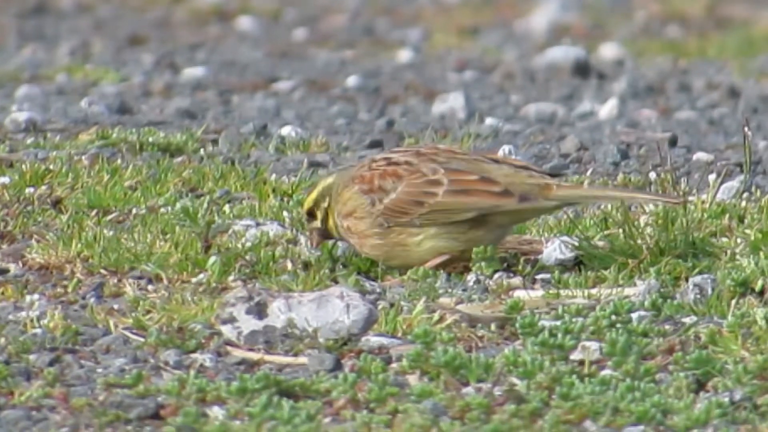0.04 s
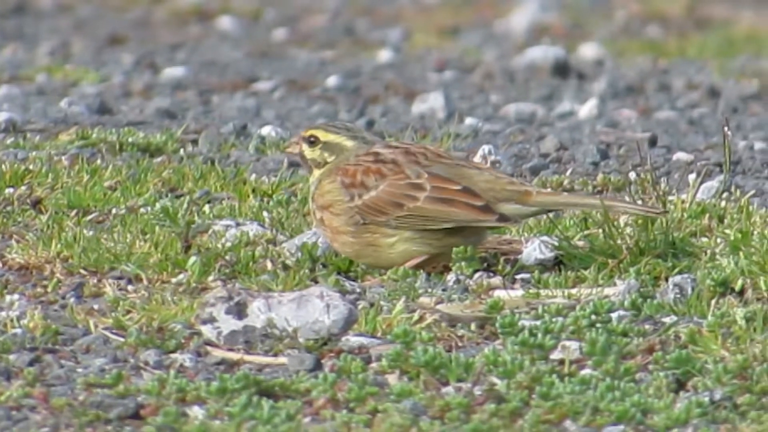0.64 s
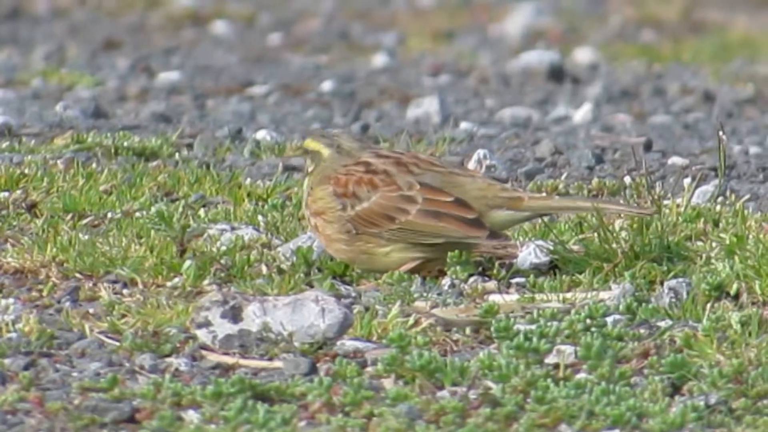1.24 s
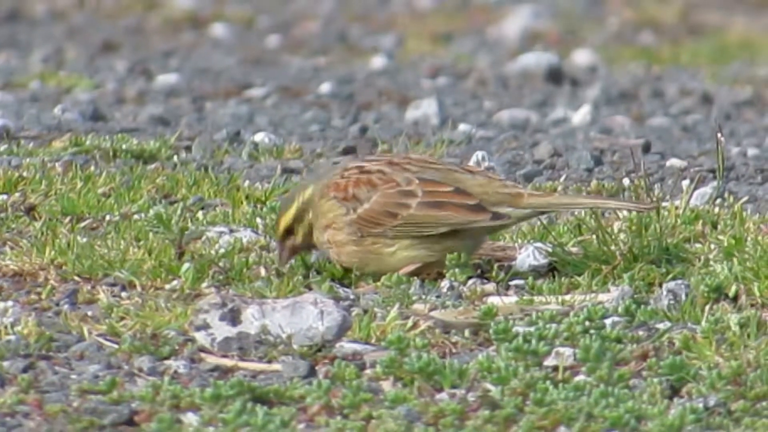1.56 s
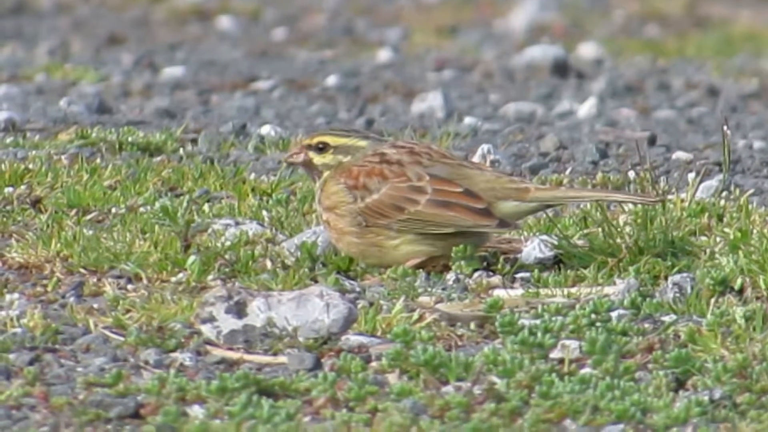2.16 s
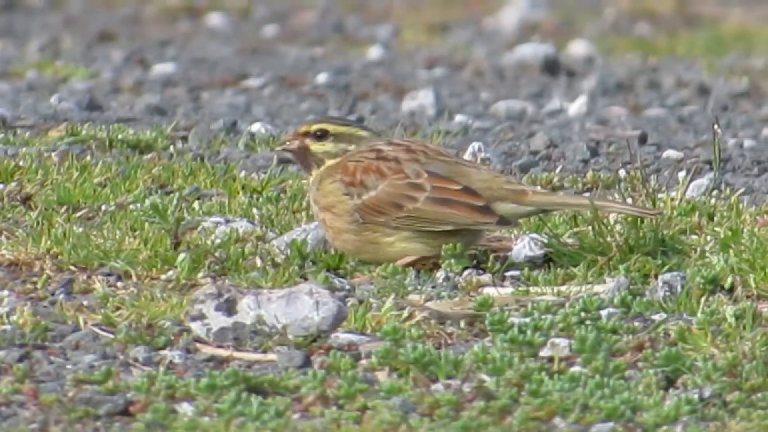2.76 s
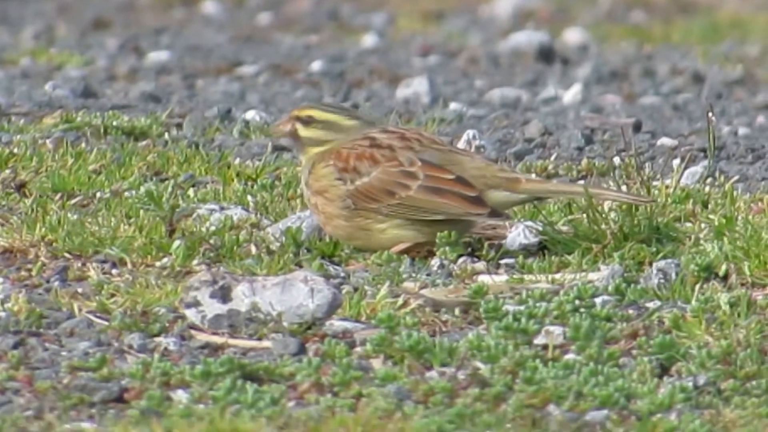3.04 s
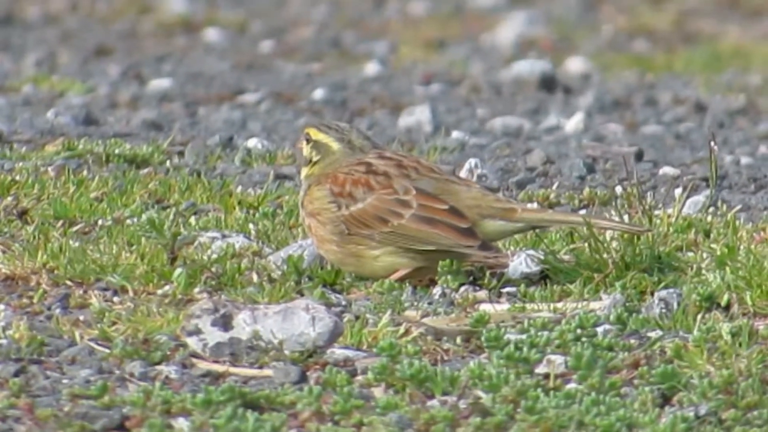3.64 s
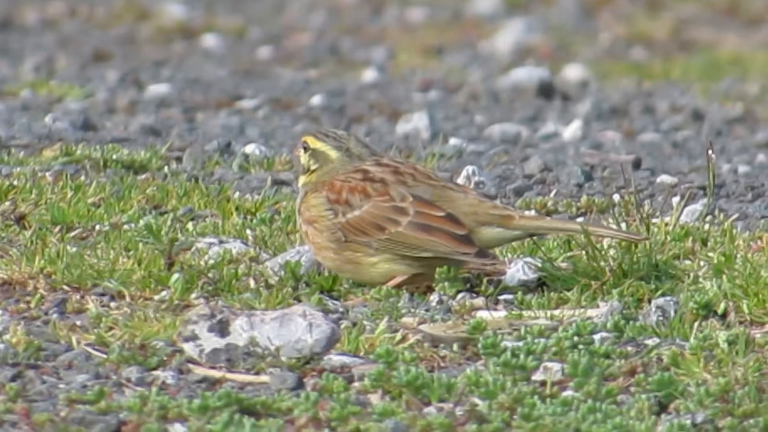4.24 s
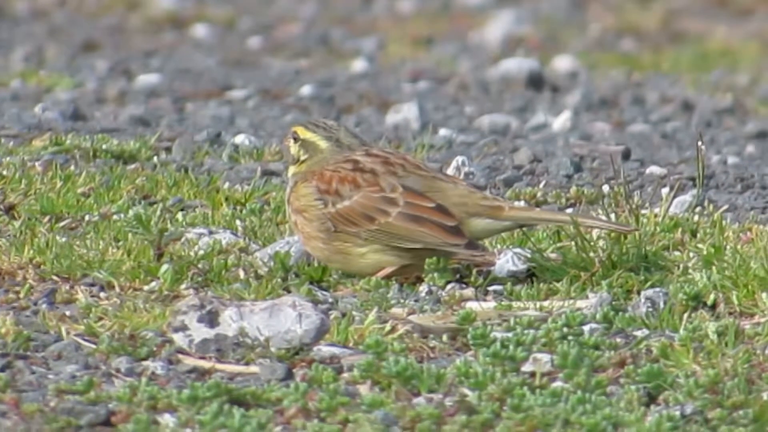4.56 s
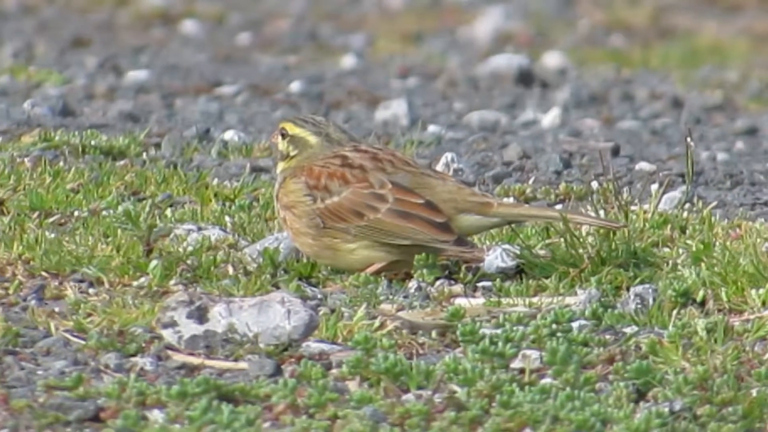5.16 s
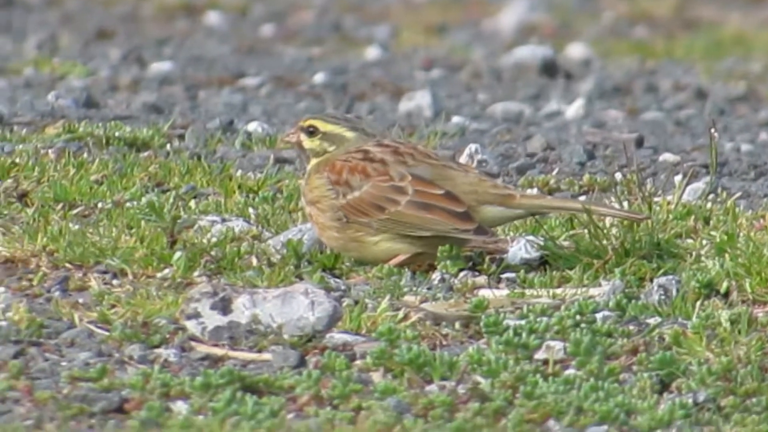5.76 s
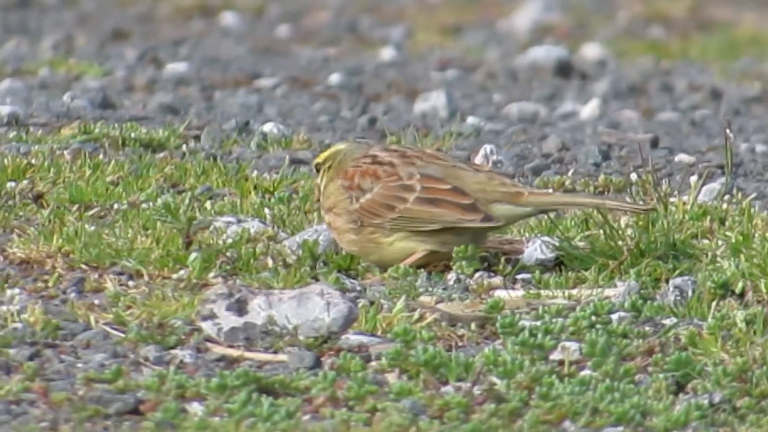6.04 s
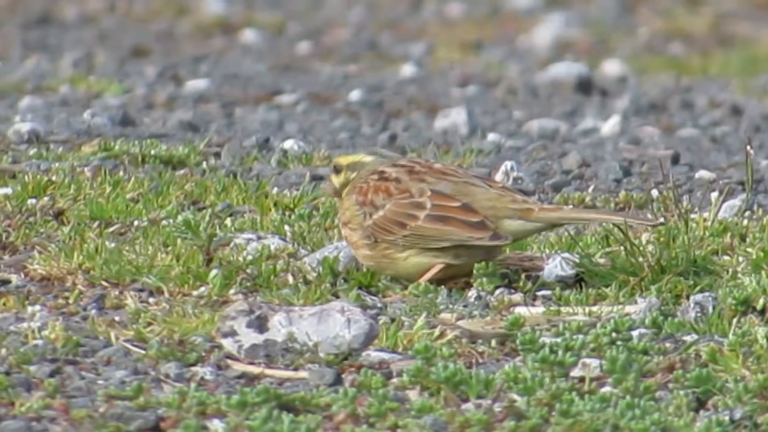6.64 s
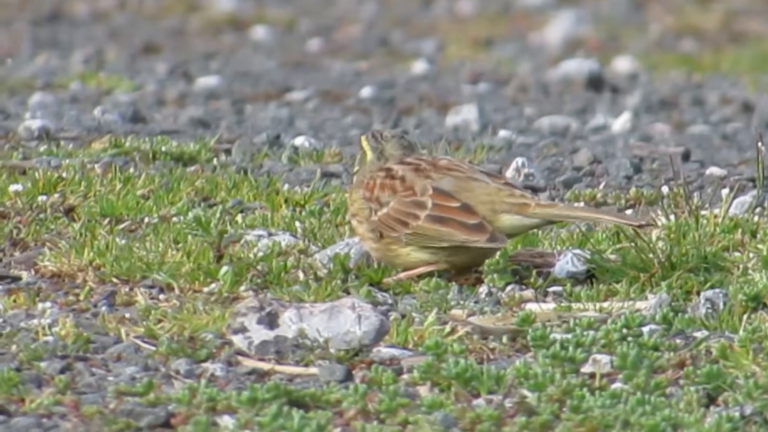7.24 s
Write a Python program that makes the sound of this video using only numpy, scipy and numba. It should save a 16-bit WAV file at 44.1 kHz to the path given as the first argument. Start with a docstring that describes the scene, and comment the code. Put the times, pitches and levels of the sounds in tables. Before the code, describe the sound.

Wind gusts rumble on the microphone over a distant engine hum, while a small bird gives two thin falling whistles and others chirp far off.

```python
"""Wind gusts buffet a camera microphone on open grassland; their eddies rumble and push the limiter down.
A distant engine throbs under airy hiss while the lens drive whirrs and whines.
A near bird whistles two thin falling calls; others chirp, pip and sing a falling run far off.
Two tiny ticks and a soft knock sound close by."""
import sys
import numpy as np
from scipy import signal
from scipy.fft import rfft, irfft
from scipy.io import wavfile
from scipy.ndimage import uniform_filter1d
from numba import njit

SR = 44100
rng = np.random.default_rng(int(sys.argv[2]) if len(sys.argv) > 2 else 0)


def materialize(psi):
    """Save the field psi as 16-bit PCM at rate SR to the path in sys.argv[1].

    A 1-D psi becomes a single channel; in a 2-D psi each row is a channel.
    """
    bounded = np.clip(np.atleast_2d(psi).T, -1, 1)
    quanta = np.round(bounded * 32767).astype(np.int16)
    wavfile.write(sys.argv[1], SR, quanta)


N = 326781
TIME = np.arange(N) / SR


def undb(db):
    """Decibels to gain."""
    return 10 ** (np.asarray(db) / 20)


def unit(x):
    """Scale to rms 1."""
    return x / np.sqrt(np.mean(x ** 2))


def walk(rate_hz):
    """Random drift, rms 1: held levels, smoothed twice."""
    hold = max(int(SR / rate_hz), 1)
    steps = np.repeat(rng.standard_normal(N // hold + 1), hold)
    return unit(uniform_filter1d(uniform_filter1d(steps, hold), hold)[:N])


def swells(rows):
    """Gain curve of bell-shaped swells."""
    return sum(undb(db) * np.exp(-((TIME - peak_s) / half_s) ** 2 / 2) for peak_s, half_s, db in rows)


@njit
def lowpass(x, corner_hz, damping):
    """State-variable low-pass with a moving corner."""
    y, band_state, low_state = np.empty(len(x)), 0., 0.
    for i in range(len(x)):
        g = np.tan(np.pi * corner_hz[i] / SR)
        band = (band_state + g * (x[i] - low_state)) / (1 + g * (g + damping))
        y[i] = low_state + g * band
        band_state, low_state = 2 * band - band_state, 2 * y[i] - low_state
    return y


def resonate(x, hz, width_hz):
    """One resonance, gain 1 at its centre."""
    return signal.lfilter(*signal.iirpeak(hz, hz / width_hz, fs=SR), x)


def noise_band(hz, width_hz):
    """Complex narrowband noise: a resonance with wandering amplitude and phase."""
    sos = signal.butter(2, width_hz / 2, fs=SR, output="sos")
    real, imag = signal.sosfilt(sos, rng.standard_normal((2, N)))
    phase = 2 * np.pi * np.cumsum(np.broadcast_to(hz, N)) / SR
    return (unit(real) + 1j * unit(imag)) * np.exp(1j * phase)


def scatter(x, early_db, late_db, early_decay_s=0.0074, t60_s=0.42):
    """Direct sound, quick ground bounces and a tail from the bushes, different at each side."""
    t = TIME[:SR // 2]
    early, late = np.exp(-t / early_decay_s), undb(-60 * t / t60_s)
    early *= undb(early_db) / np.linalg.norm(early)
    late *= undb(late_db) / np.linalg.norm(late)
    tails = rng.standard_normal((2, len(t))) * np.hypot(early, late)
    return x + signal.fftconvolve(x[None], tails, axes=1)[:, :N]


# Each row: frequency in Hz, mid density in dB per Hz, side density in dB per Hz.
AIR_SPECTRUM = [(20, -88, -71.5), (43.7, -57.5, -79), (74, -54, -67), (144, -63.5, -71.5),
                (255, -72, -71.5), (405, -80.5, -74.5), (860, -76.5, -80.5), (1176, -83.5, -82),
                (1715, -85, -87.5), (2030, -90, -88), (3350, -93.5, -92.5), (7730, -98.5, -98.5),
                (10650, -102, -102), (14100, -110, -110)]


def air(swell_db=-1.07):
    """Far traffic and breeze: a gently drifting noise bed, diffuse above the bass."""
    log_hz = np.log(np.maximum(np.fft.rfftfreq(N, 1 / SR), 1))
    points_hz, *densities_db = np.transpose(AIR_SPECTRUM)
    gains = [undb(np.interp(log_hz, np.log(points_hz), db)) * np.sqrt(SR / 2) for db in densities_db]
    mid, side = (irfft(rfft(rng.standard_normal(N)) * gain, N) for gain in gains)
    return np.array([mid + side, mid - side]) * undb(swell_db * walk(1.9))


# Each row: peak time in seconds, half length in seconds, level in dB.
ENGINE_THROBS = [(.2, 0.36, -32.5), (1.82, 0.5, -33), (3.65, 0.51, -37), (6.15, 0.45, -35), (7.25, .2, -44)]


def engine(firing_hz=113.4, waver=0.0037, second_harmonic_db=-29):
    """A far engine's firing tone swells and fades, slightly to the right."""
    phase = 2 * np.pi * np.cumsum(firing_hz * (1 + waver * walk(5.98))) / SR
    tone = np.sqrt(2) * (np.sin(phase) + undb(second_harmonic_db) * np.sin(2 * phase))
    return tone * swells(ENGINE_THROBS) * undb([[-1], [1]])


# Camera body resonances. Each row: frequency in Hz, width in Hz, level in dB.
BODY_MODES = [(417, 18, -65.5), (594.7, 60, -58.5), (639, 55, -59), (764, 13, -54), (794, 48, -52),
              (880.6, 27.5, -58)]
# Swells of a higher resonance. Each row: peak time in seconds, half length in seconds, level in dB.
UPPER_MODE_SWELLS = [(3.8, 0.9, -56.5), (6.6, 0.55, -57.5)]


def lens(left_lead_rad=1.68, whine_start_hz=10860, rise_hz_per_s=62, whine_db=-69, waver=0.0044):
    """The lens drive rings the camera body, nearer the right port; its whine creeps upward."""
    body = sum(undb(db) * noise_band(hz, width_hz) for hz, width_hz, db in BODY_MODES)
    body += swells(UPPER_MODE_SWELLS) * noise_band(hz=1450, width_hz=170)
    ports = np.array([[undb(-3.5) * np.exp(1j * left_lead_rad)], [undb(3.5)]])
    whine_hz = (whine_start_hz + rise_hz_per_s * TIME) * (1 + waver * walk(6))
    whine = undb(whine_db) * noise_band(whine_hz, width_hz=300)
    return np.real(body * ports + whine)


# Each row: start in seconds, length in seconds, pitch in Hz, slide in Hz, level in dB, trill depth in Hz.
FAR_CHIRPS = [(.01, 0.13, 7700, -190, -65, 60), (.315, .2, 4320, 61, -61.5, 150),
              (.39, 0.051, 4050, -26, -54.5, 30), (2.924, 0.086, 5700, -300, -66, 40),
              (3.02, .12, 5160, -560, -61.5, 30), (3.275, 0.048, 4800, -40, -62, 27.78),
              (4.728, 0.09, 3690, -300, -62.5, 171), (4.9, .07, 5400, -200, -60, 280),
              (5.07, .09, 5900, -67, -63, 70), (5.363, .09, 4730, -40, -61, 40),
              (5.591, 0.1, 4450, -70, -67, 30), (5.72, .09, 3400, 3, -62.5, 190)]


def far_birds(gain_db=-1.5, trill_rate_hz=70, waver=0.0092, flutter_db=3.0):
    """Short whistled slides with a slight trill, fluttering and blurred by distance."""
    song = np.zeros(N)
    drift = 1 + waver * walk(90)
    for start_s, length_s, pitch_hz, slide_hz, db, depth_hz in FAR_CHIRPS + pips() + falling_run():
        on = (TIME > start_s) & (TIME < start_s + length_s)
        progress = (TIME[on] - start_s) / length_s
        trill_hz = depth_hz * np.sin(2 * np.pi * trill_rate_hz * TIME[on])
        hz = (pitch_hz + slide_hz * progress) * drift[on] + trill_hz
        envelope = np.sqrt(2 * np.abs(np.sin(np.pi * progress)))
        song[on] += undb(db + gain_db) * envelope * np.sin(2 * np.pi * np.cumsum(hz) / SR)
    return scatter(song * undb(flutter_db * walk(70)), early_db=-7, late_db=-0.5)


def pips(count=3, start_s=0.596, every_s=0.178, length_s=0.018, hz=2400, db=-53.5):
    """One far bird repeats a soft pip; returns chirp rows."""
    return [(start_s + k * every_s, length_s, hz, 0, db, 0) for k in range(count)]


# Each row: start in seconds, level in dB.
NEAR_CALLS = [(1, -49.5), (7.258, -48)]


def near_bird(start_hz=10090, end_hz=6940, bend=1.37, waver=0.004, flutter_db=-0.5,
              length_s=0.215, attack_s=0.066, release_s=0.018):
    """A pure whistle slides down and levels off; its reflections trail above the falling pitch."""
    song = np.zeros(N)
    for start_s, db in NEAR_CALLS:
        age_s = TIME - start_s
        remaining = np.clip(1 - age_s / length_s, 0, 1)
        hz = (end_hz + (start_hz - end_hz) * remaining ** bend) * (1 + waver * walk(150))
        envelope = np.clip(np.minimum(age_s / attack_s, (length_s - age_s) / release_s), 0, 1)
        whistle = np.sqrt(2) * np.sin(2 * np.pi * np.cumsum(hz) / SR)
        song += undb(db + flutter_db * walk(120)) * envelope * whistle
    return scatter(song, early_db=-26, late_db=5)


# Each row: start in seconds, hold in seconds, level in dB.
WIND_GUSTS = [(1.5, 0.61, -27), (3.78, 0.53, -19.5), (4.525, 0.034, -6.5), (4.89, 0.11, -18),
              (5.27, 0.2, -17), (5.604, .03, -16), (5.816, 0.09, -20.5), (6.503, 0.073, -20),
              (6.75, 0.026, -19.5)]
# Breeze under the later gusts. Each row: peak time in seconds, half length in seconds, level in dB.
BREEZE_SWELLS = [(5.57, 1.1, -33.5)]


def gust_level_db(rise_db_per_s=239, fall_db_per_s=142):
    """Each gust rises quickly out of the breeze, holds and dies away."""
    power = swells(BREEZE_SWELLS) ** 2
    for start_s, hold_s, db in WIND_GUSTS:
        before_s = np.maximum(start_s - TIME, 0)
        after_s = np.maximum(TIME - start_s - hold_s, 0)
        power += undb(db - rise_db_per_s * before_s - fall_db_per_s * after_s) ** 2
    return 10 * np.log10(power + 1e-12)


def turbulence(gust_db, clump_db=3.0, ref_hz=135, ref_db=-11, db_per_octave=14, max_swing=0.7):
    """Eddies come in clumps and get smaller and quicker as the wind rises, brightening the rumble."""
    level_db = gust_db + clump_db * walk(45)
    corner_hz = np.clip(ref_hz * 2 ** ((level_db - ref_db) / db_per_octave), 60, 400)
    flow = lowpass(rng.standard_normal(N), corner_hz, damping=1.74)
    flow = lowpass(flow, 1.51 * corner_hz, damping=1.25) / np.sqrt(corner_hz)
    flow = unit(signal.sosfilt(signal.butter(2, 20, "high", fs=SR, output="sos"), flow))
    return max_swing * np.tanh(flow * undb(level_db) / max_swing)


def wind(gust_mid_db=-16, buffet_mid_db=-15):
    """Gusts and buffets drive the two channels mostly in opposite phase."""
    gust_db, blows = gust_level_db(), buffets()
    side = turbulence(gust_db) + blows
    mid = undb(gust_mid_db) * turbulence(gust_db) + undb(buffet_mid_db) * blows
    return np.array([mid + side, mid - side])


# Each row: start in seconds, peak in dB, frequency in Hz, decay time in seconds.
BRIGHT_TICKS = [(2.387, -37, 13400, .0018), (2.4101, -43, 12300, 0.0013)]


def ticks(width_hz=2000):
    """Tiny ticks: brief noise bursts ring a high resonance."""
    out = np.zeros(N)
    for start_s, db, hz, decay_s in BRIGHT_TICKS:
        envelope = (TIME > start_s) * np.exp(-np.abs(TIME - start_s) / decay_s)
        ring = resonate(rng.standard_normal(N) * envelope, hz, width_hz)
        out += undb(db) * ring / np.abs(ring).max()
    return out


def knock(start_s=2.4475, ring_hz=205, ring_db=-26.5, rise_s=0.0031,
          click_hz=1900, click_db=-28, click_decay_s=0.00029):
    """A soft knock on the camera: a small contact click and a short low ring."""
    age_s = np.maximum(TIME - start_s, 0)
    envelope = age_s / rise_s * np.exp(1 - age_s / rise_s)
    ring = np.sin(2 * np.pi * ring_hz * age_s) * envelope
    click = np.sin(2 * np.pi * click_hz * age_s) * np.exp(-age_s / click_decay_s)
    return undb(ring_db) * ring - undb(click_db) * click


# Each row: centre in seconds, level in dB, first eddy frequency in Hz, step per eddy in dB.
EDDY_TRAINS = [(3.802, -6, 146, -22), (4.237, 3.5, 80, -9.5), (4.312, -5.5, 159, -14),
               (4.516, 0.5, 111, -2.5), (4.539, 4.5, 285, -10), (4.587, -5, 225, -10),
               (4.899, -7.5, 137, -15), (5.003, -8, 213, -10), (5.274, -7.5, 108.4, -7),
               (5.355, -5, 57, -18), (5.455, 2, 135, -12.5), (6.524, -7, 76.5, -19)]


def buffets(eddy_count=5, pitch_ratio=1.33, gap_cycles=1.38):
    """A strong eddy is one swing of suction and pressure; it sheds a train of smaller, quicker ones."""
    out = np.zeros(N)
    for centre_s, db, hz, step_db in EDDY_TRAINS:
        for k in range(eddy_count):
            cycles = np.clip(hz * (TIME - centre_s), -3, 3)
            out += undb(db + k * step_db) * np.sin(2 * np.pi * cycles) * np.exp(-np.pi * cycles ** 2)
            centre_s += gap_cycles / hz
            hz *= pitch_ratio
    return out


def falling_run(count=6, start_s=6.49, every_s=0.14, length_s=0.13, db=-65.5, step_db=-0.2,
                start_hz=6830, floor_hz=4500, step_share=0.32, slide_hz=-120, trill_depth_hz=170):
    """A far bird sings notes, each lower and fainter than the last; returns chirp rows."""
    pitches_hz = [floor_hz + (start_hz - floor_hz) * (1 - step_share) ** k for k in range(count)]
    return [(start_s + k * every_s, length_s, hz, slide_hz, db + k * step_db, trill_depth_hz)
            for k, hz in enumerate(pitches_hz)]


def scene():
    """Stereo sum at the microphone."""
    return wind() + air() + engine() + lens() + near_bird() + far_birds() + ticks() + knock()


@njit
def limiter_gain(peak, ceiling, attack_s, release_s):
    """The gain drops quickly under a peak and creeps back."""
    gains, gain = np.empty(len(peak)), 1.
    for i in range(len(peak)):
        allowed = ceiling / (peak[i] + 1e-9)
        if allowed < gain:
            gain += (allowed - gain) / (1 + attack_s * SR)
        else:
            gain += (1 - gain) / (release_s * SR)
        gains[i] = gain
    return gains


def record(dry, notch_hz=3960, top_hz=13700):
    """The camera notches two bands, limits the gusts, clips what slips through and cuts the top."""
    for hz in (notch_hz, 2 * notch_hz):
        dry = dry - resonate(dry, hz, width_hz=300)
    gain = limiter_gain(np.abs(dry).max(axis=0), ceiling=0.94, attack_s=0.000069, release_s=0.34)
    limited = np.clip(dry * gain, -1, 1)
    return signal.sosfilt(signal.ellip(8, 0.2, 70, top_hz, fs=SR, output="sos"), limited)


dry = scene()
out = record(dry)
materialize(out)
```